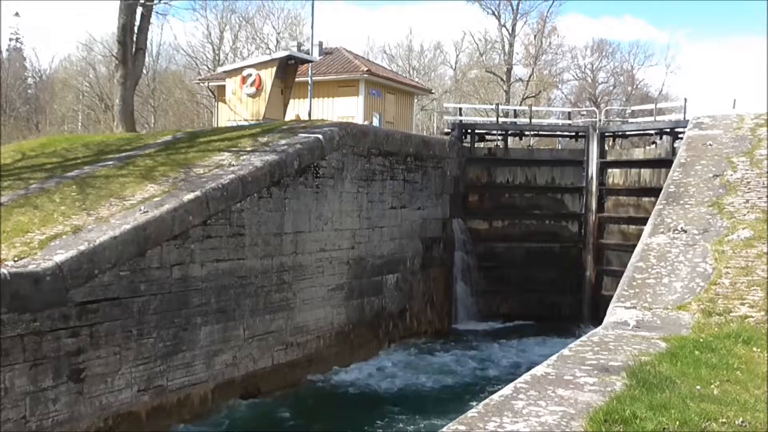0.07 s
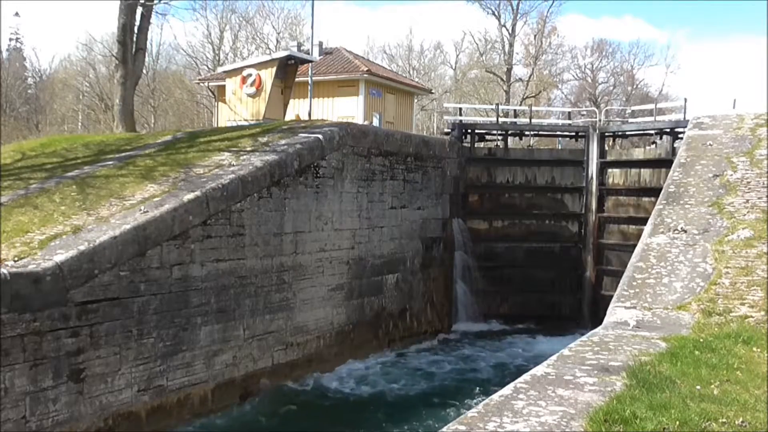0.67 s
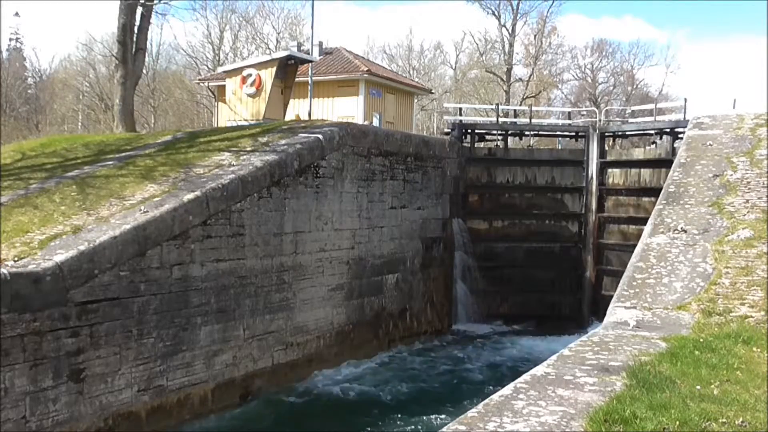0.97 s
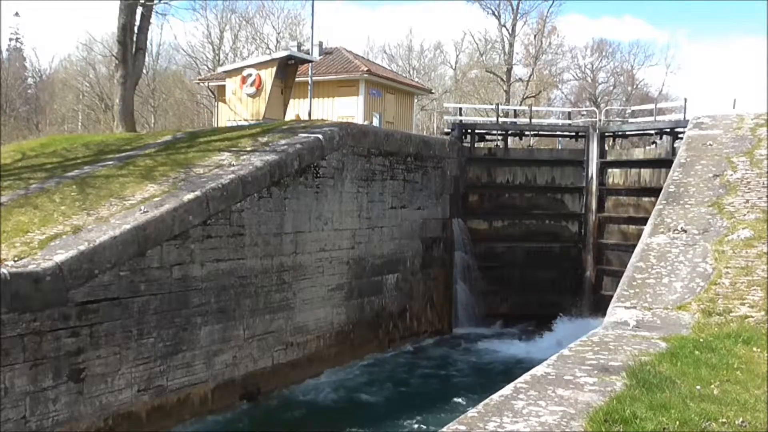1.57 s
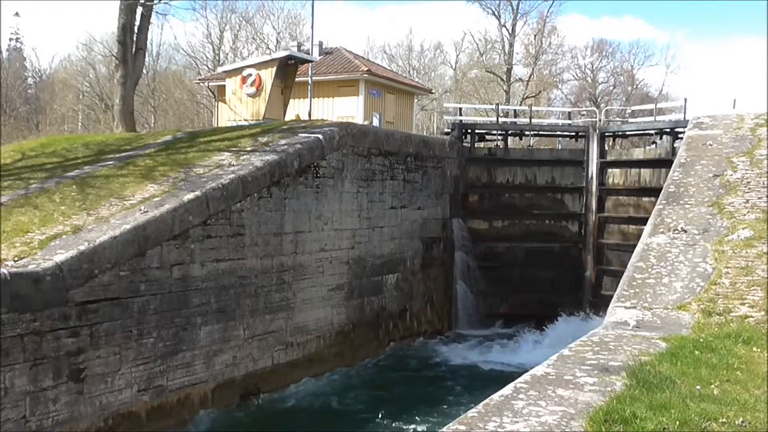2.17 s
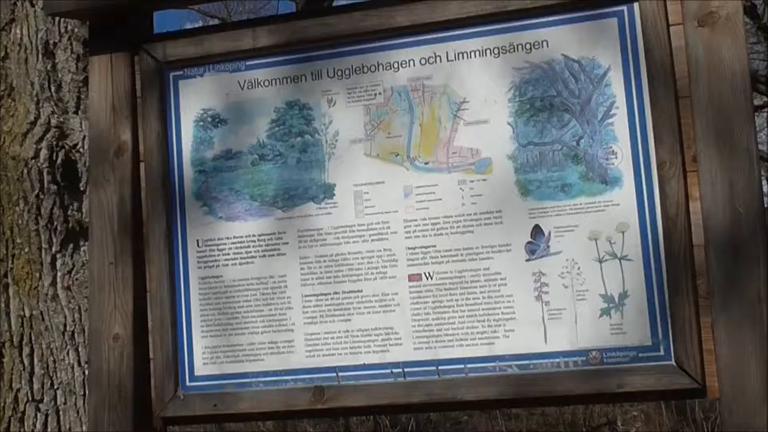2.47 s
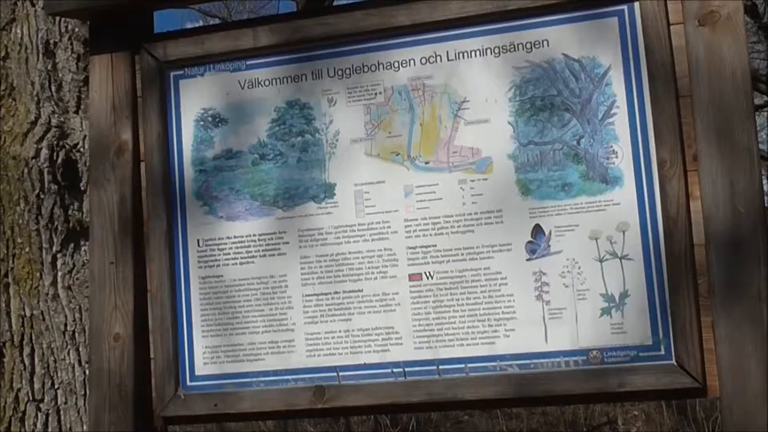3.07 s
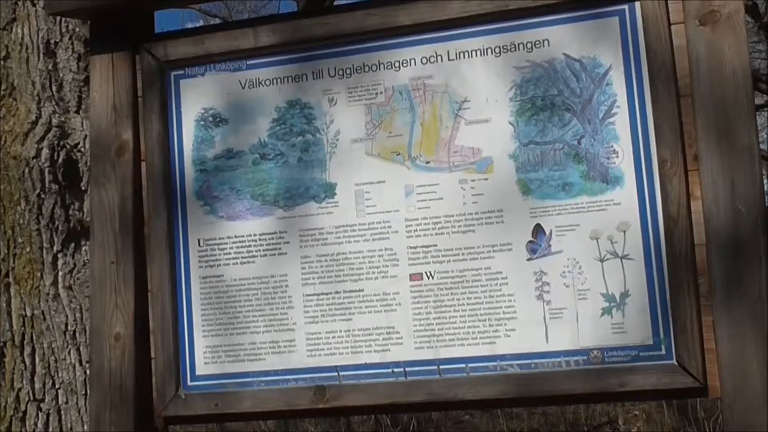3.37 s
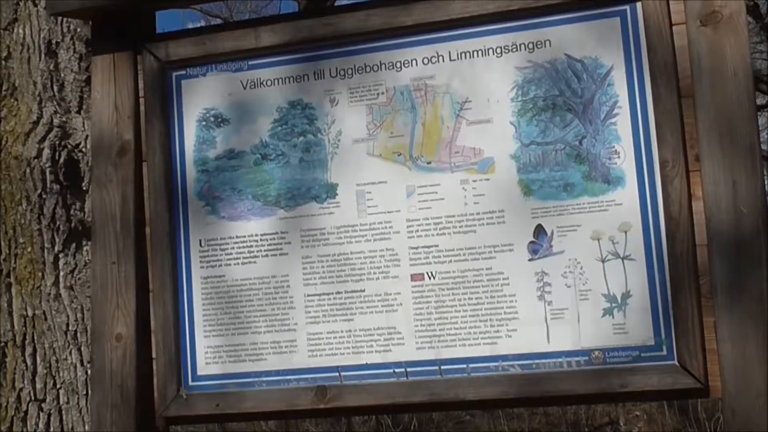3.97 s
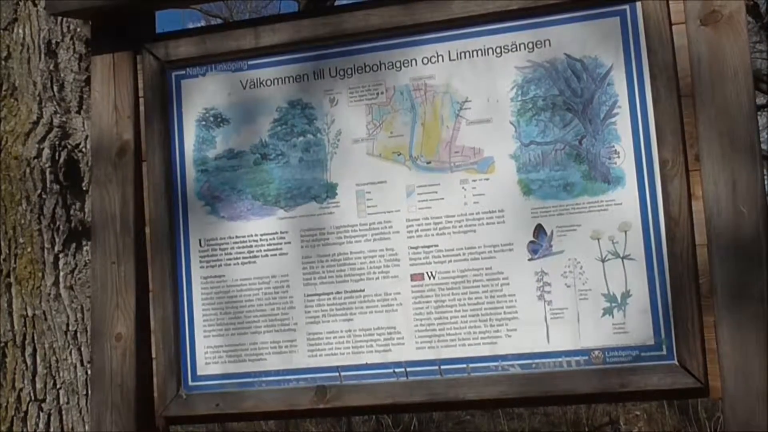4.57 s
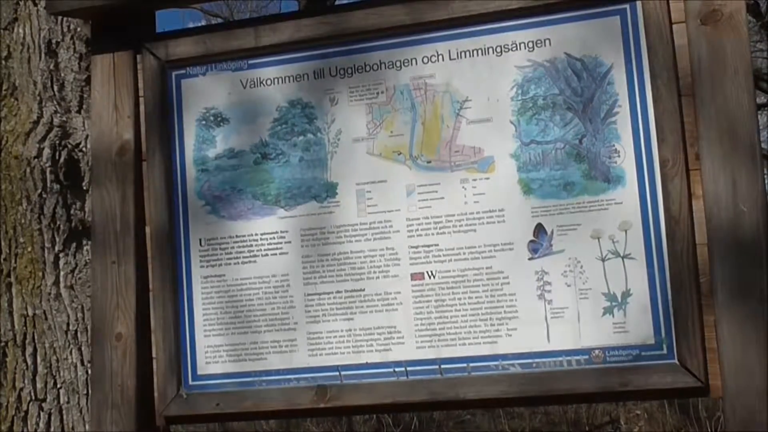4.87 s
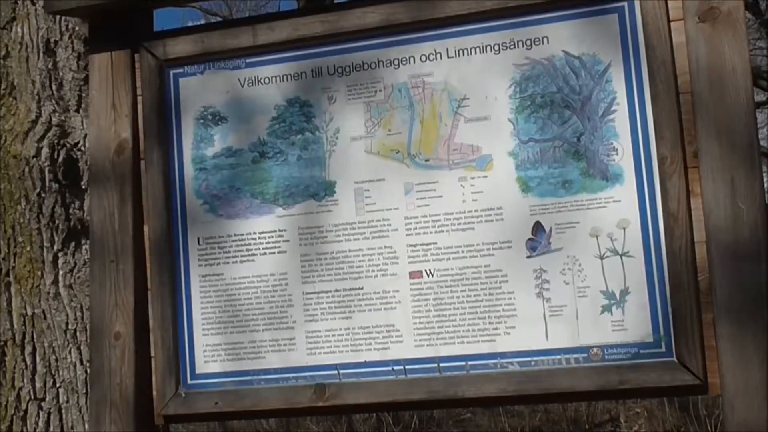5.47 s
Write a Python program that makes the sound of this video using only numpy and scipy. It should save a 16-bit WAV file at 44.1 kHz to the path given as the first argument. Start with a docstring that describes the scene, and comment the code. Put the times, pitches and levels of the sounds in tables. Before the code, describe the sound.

Water pours and churns through canal lock gates, cuts off, then returns as a dull distant rush with wind puffs on the microphone.

```python
"""Leaking canal lock, near and far

Water pours through the gates of a stone lock: the jet drags air under in a glugging rumble, bubbles
churn and boil up, and spray fizzes on the foam. It stops dead. After half a second of silence the rush
is heard from far off, dull, hollow and a little to the left, while puffs of wind buffet the microphone."""
import sys
import numpy as np
from scipy import signal
from scipy.fft import rfft, irfft, next_fast_len
from scipy.io import wavfile

SR = 44100
rng = np.random.default_rng(int(sys.argv[2]) if len(sys.argv) > 2 else 0)


def inscribe(sig):
    """Save sig as 16-bit PCM at rate SR to the path in sys.argv[1].

    A 1-D sig is mono; a 2-D sig holds one channel per row.
    Samples are clipped to [-1, 1] before scaling.
    """
    pcm = np.round(np.clip(np.atleast_2d(sig).T, -1, 1) * 32767)
    wavfile.write(sys.argv[1], SR, pcm.astype(np.int16))


N = 247401
TIME = np.arange(N) / SR
HZ = np.maximum(np.fft.rfftfreq(next_fast_len(N), 1 / SR), 1)
LOCK_END_S, FAR_START_S = 2.3823, 2.9243


# tone of the rumble: freq_hz, level_db
PLUNGE_TONE = [(20, -41.5), (48, -23.5), (65, -9.5), (88, -4), (130, 0), (180, 0.5), (250, 1.5), (280, -3),
               (330, -7.5)]
# heavier gulps of air and the slack between them: centre_s, lift_db
PLUNGE_GULPS = [(0.02, 1), (0.46, -4), (0.54, 1.5), (0.62, -2.5), (0.83, -2.5), (1.06, 1), (1.2, -3.5),
                (1.35, 0), (1.66, -1), (1.99, 1.5), (2.25, -1)]

def plunge(level_db=-25.5, slope_db_per_s=-1, heave_db=0.44):
    """The jet drives big air pockets under in gulps; their rumble slowly eases."""
    fader_db = level_db + slope_db_per_s * TIME + swells(PLUNGE_GULPS, half_s=0.031)
    return from_db(fader_db - heave_db * drift(2.6)) * coloured(wash(), PLUNGE_TONE)


# tone of the churn: freq_hz, level_db
CHURN_TONE = [(330, 1), (400, 2), (560, 0), (860, -5), (1000, -3), (1160, -4.5), (1260, -8.5), (1470, -5),
              (1730, -12), (2000, -12), (2400, -16.5), (2800, -21)]
# bursts of bubbles, in full in the boil and in part in the churn: centre_s, lift_db
BUBBLE_BURSTS = [(0.425, 10), (0.72, 2), (1.44, 0), (2.32, 2)]

def churn(level_db=-25.5, bubble_db=-4, burst_share=0.21, surge_db=0.17):
    """Splashes and smaller bubbles merge into a steady midrange froth."""
    froth = wash() + from_db(bubble_db) * bubbles(5000, band_hz=(298.6, 3104), cycles=12.8, size_db=1)
    fader_db = level_db + burst_share * swells(BUBBLE_BURSTS, half_s=0.016) + surge_db * drift(4.2)
    return from_db(fader_db) * coloured(froth, CHURN_TONE)


# tone of the gurgle: freq_hz, level_db
BOIL_TONE = [(330, -10), (450, -1), (530, 0), (610, 1), (700, -2), (850, -7.5)]
# long hollow upwellings: centre_s, lift_db
BOIL_UPWELLINGS = [(1.04, 2.5), (1.46, 2), (1.67, 1), (1.93, 3), (2.31, 0.5)]

def boil(level_db=-30.5, crest_s=1.35, rise_db_per_s=5.5):
    """Bubbles boil up at the foot of the gates; the gurgle builds to a crest and holds."""
    fader_db = level_db - rise_db_per_s * np.maximum(crest_s - TIME, 0)
    lift_db = swells(BOIL_UPWELLINGS, half_s=0.085) + swells(BUBBLE_BURSTS, half_s=0.016)
    gurgle = bubbles(4000, band_hz=(353, 868), cycles=10, size_db=0, pitches=8)
    return from_db(fader_db + lift_db) * coloured(gurgle, BOIL_TONE)


# tone of the spray: freq_hz, level_db
SPRAY_TONE = [(2800, -3.5), (3400, -4), (3900, -1), (4700, -1), (6400, -3), (7700, -7.5), (8600, -8.5),
              (9500, -14.5), (11000, -13), (13500, -18), (14800, -17.5), (15600, -26)]
# the spray grows as the foam spreads: time_s, level_db
SPRAY_FADER = [(0.0, -32), (1.4, -32.5), (2.37, -31)]

def spray(droplet_db=-5, flutter_db=0.34):
    """Droplets land on the foam in a bright fizz."""
    fizz = wash() + from_db(droplet_db) * bubbles(9000, band_hz=(2480, 15050), cycles=7.6, size_db=2.5)
    fader_db = np.interp(TIME, *np.transpose(SPRAY_FADER)) + flutter_db * drift(12)
    return from_db(fader_db) * coloured(fizz, SPRAY_TONE)


# single glugs: centre_s, pitch_hz, peak_db, half_length_s
GATE_GLUGS = [(0.194, 96, -24.5, .04), (0.268, 187, -24, .05), (0.288, 385, -21.5, 0.011),
              (0.365, 164, -20, .016), (0.557, 490, -22, 0.024), (0.665, 101, -28, 0.027),
              (0.714, 497, -22, .009), (0.718, 158, -25, 0.027), (0.883, 186, -22.5, .017),
              (1.003, 178, -28, 0.067), (1.006, 533, -26, .035), (1.439, 598, -20, 0.013),
              (1.467, 535, -27.5, 0.05), (1.661, 481, -26.5, .04), (1.919, 474, -26, .014),
              (2.321, 453, -22, 0.0072)]

def glugs():
    """Large air pockets ring at the gates, bending up in pitch."""
    return air_pockets(GATE_GLUGS, rise_per_s=0.68)


# stereo image at the lock: freq_hz, coherence
NEAR_COHERENCE = [(30, 0.74), (70, 0.8), (130, 0.97), (500, 1), (1000, 0.95), (2400, 0.84), (3000, 0.92),
                  (5000, .91), (7000, 1), (9500, 0.74), (11300, 0.77), (12800, 1)]
# freq_hz, left_over_right_db
NEAR_PAN = [(60, -2), (130, -2.5), (350, -3), (600, -1), (1000, 2), (1500, 0.2), (2250, 2), (3500, 0),
            (7500, 0), (10500, -1.5), (13000, 0)]
# freq_hz, left_lead_rad
NEAR_PHASE = [(90, -0.25), (250, -0.048), (750, 0.5), (1100, .16), (2000, .2), (2600, 0.021), (15000, 0)]

def lock_fall():
    """The falling water close up, spread in stereo."""
    return spread(plunge() + churn() + boil() + spray() + glugs(), NEAR_COHERENCE, NEAR_PAN, NEAR_PHASE)


# tone of the far roar: freq_hz, level_db
ROAR_TONE = [(20, -11), (47, -24), (62, -3), (108, -2), (135, 1.5), (172, 0.5), (220, 5.5), (285, 3),
             (350, 1), (390, 2), (455, .5), (560, -5.5)]
# hollow resonances: pitch_hz, width_hz, lift_db
ROAR_MODES = [(131, 21, 5), (296, 41, 2.5), (256, 19, 1.5)]
# surges and lulls: centre_s, lift_db
ROAR_SURGES = [(2.94, 3), (3.06, -0.5), (3.27, 3), (3.53, -1.5), (3.68, -2.5), (3.97, 1), (4.13, -4.5),
               (4.32, 0.5), (4.52, -0.5), (4.77, -2), (5.22, 1), (5.34, 3), (5.43, -2), (5.6, 0.5)]

def roar(level_db=-31.5, slope_db_per_s=0.5, heave_db=0.2):
    """Distance merges the splashes into a dull, hollow, surging roar that slowly fills out."""
    fader_db = level_db + slope_db_per_s * (TIME - FAR_START_S) + swells(ROAR_SURGES, half_s=0.032)
    return from_db(fader_db + heave_db * drift(1.3)) * coloured(resonant(wash(), ROAR_MODES), ROAR_TONE)


# tone of the far hiss: freq_hz, level_db
HISS_TONE = [(560, -1), (840, -5), (1000, -5.5), (1420, -8.5), (2000, -14), (2550, -19), (2900, -21.5),
             (3350, -18.5), (3750, -16), (4750, -15.5), (7800, -22.5), (9600, -25.5), (11400, -33.5),
             (14200, -37), (15000, -54)]
# its level ride: time_s, level_db
HISS_FADER = [(2.94, -37.5), (3.35, -38.5), (3.7, -39), (4.6, -39), (5.6, -38.5)]

def hiss(waver_db=0.23):
    """The soft top of the far splashes wavers in the moving air."""
    fader_db = np.interp(TIME, *np.transpose(HISS_FADER)) + waver_db * drift(6.1)
    return from_db(fader_db) * coloured(wash(), HISS_TONE)


# single booms: centre_s, pitch_hz, peak_db, half_length_s
FAR_BOOMS = [(2.976, 279, -32, 0.081), (3.17, 137, -35.5, 0.024), (3.341, 256.5, -31.5, 0.086),
             (3.38, 288, -30, 0.088), (3.602, 223, -23.5, 0.014), (3.713, 133.6, -32, 0.055),
             (3.96, 280, -30, 0.02), (4.024, 166, -30, 0.034), (4.15, 135, -31, 0.029),
             (4.217, 274, -26.5, 0.032), (4.284, 255, -26, 0.021), (4.35, 287, -31.5, 0.043),
             (4.451, 391, -32.5, 0.026), (4.632, 286, -35, 0.088), (4.688, 231, -29.5, 0.048),
             (4.722, 133.5, -29.5, 0.064), (4.843, 223, -26, 0.02), (4.89, 134.6, -30.5, 0.045),
             (4.97, 225, -27, 0.033), (5.002, 286, -34.5, 0.096), (5.077, 136, -25, 0.021),
             (5.35, 139, -29.5, 0.029), (5.539, 295, -32.5, 0.058)]

def booms():
    """Air pockets ring low inside the far roar."""
    return air_pockets(FAR_BOOMS, rise_per_s=0.16)


# stereo image far off: freq_hz, coherence
FAR_COHERENCE = [(40, 0.22), (130, 0.99), (280, 1), (500, 0.89), (900, 0.94), (2000, 0.82), (3000, 0.47),
                 (4500, 0.79), (7000, 0.97), (9000, 0.47), (14000, 0.33)]
# freq_hz, left_over_right_db
FAR_PAN = [(100, -0.7), (650, -0.5), (1100, 5.0), (4000, 5.5), (6500, 4), (8000, -.5), (10000, -2),
           (14000, 1)]
# freq_hz, left_lead_rad
FAR_PHASE = [(120, 0.03), (450, 0.14), (900, 0.93), (1300, 0.69), (4000, 0.3), (5700, 1), (6700, 0.9),
             (8000, 0.84), (10000, 2.6)]

def far_rush():
    """The same water from a distance, sitting a little to the left."""
    return spread(roar() + hiss() + booms(), FAR_COHERENCE, FAR_PAN, FAR_PHASE)


# tone of the turbulence: freq_hz, level_db
WIND_TONE = [(20, -22), (45, -14), (65, -7), (110, 6), (170, -7), (260, -9), (420, -22), (900, -32),
             (2500, -55)]
# puffs out of a light breeze: peak_s, level_db
WIND_PUFFS = [(3.24, -27), (3.58, -25), (3.68, -27), (3.73, -31), (4.06, -25), (4.135, -21), (4.41, -33),
              (4.47, -34), (5.0, -30), (5.17, -29), (5.32, -36)]
# single eddies that thump: centre_s, level_db, pitch_hz
WIND_EDDIES = [(3.237, -14, 150), (3.591, -3, 219), (3.687, -21, 150), (4.121, -12, 160), (4.132, -12, 300),
               (4.138, -14, 140), (4.154, -13, 110), (5.022, -14, 95), (5.04, -10, 135), (5.316, -19, 150)]

def wind(breeze_db=-46, rise_db_per_s=240, fall_db_per_s=260, left_db=-5, right_db=-1):
    """Puffs and eddies press unequally on the microphone's two ports, swinging them in opposite senses."""
    gust_db = breeze_db
    for peak_s, level_db in WIND_PUFFS:
        drop_db = np.maximum(rise_db_per_s * (peak_s - TIME), fall_db_per_s * (TIME - peak_s))
        gust_db = np.maximum(gust_db, level_db - drop_db)
    pressure = from_db(gust_db) * coloured(rng.standard_normal(N), WIND_TONE)
    for centre_s, level_db, hz in WIND_EDDIES:
        passing = (np.pi * hz * (TIME - centre_s)) ** 2
        pressure += from_db(level_db) * (1 - 2 * passing) * np.exp(-passing)   # core and opposite flanks
    return np.array([-from_db(left_db) * pressure, from_db(right_db) * pressure])


def wash():
    """Three noise voices of countless merged splashes."""
    return rng.standard_normal((3, N))


def bubbles(per_s, band_hz, cycles, size_db, pitches=16):
    """Three voices of bubbles, born at random, each ringing a few cycles at the pitch of its size."""
    out = np.zeros((3, N))
    for hz in np.geomspace(*band_hz, pitches):
        chance = rng.random((3, N)) * SR * pitches / per_s
        born = chance < 1
        sizes = np.minimum(-np.log(chance[born] + 1e-12), 5)   # big ones are exponentially rarer
        clicks = np.full((3, N), 1e-18)
        clicks[born] = from_db(size_db * sizes)
        decay = from_db(-60 * hz / (cycles * SR))
        poles = [1, -2 * decay * np.cos(2 * np.pi * hz / SR), decay ** 2]
        out += np.sqrt(hz) * rms_one(signal.lfilter([1, 0, -1], poles, clicks))   # even power per Hz
    return rms_one(out)


def air_pockets(rows, rise_per_s):
    """Each pocket swells, rings and fades, its pitch climbing as it nears the surface; direct voice only."""
    out = np.zeros((3, N))
    for (centre_s, hz, peak_db, half_s), phase in zip(rows, rng.random(len(rows))):
        age = TIME - centre_s
        turns = phase + hz * age * (1 + .5 * rise_per_s * age)
        out[0] += from_db(peak_db) * np.exp(-(age / half_s) ** 2) * np.sin(2 * np.pi * turns)
    return out


def resonant(voices, modes, wander_db=2, wander_s=0.00201):
    """Boost narrow bands that each swell and fade; a wavering delay bends their pitch."""
    lifted = voices.copy()
    for hz, width_hz, lift_db in modes:
        band = filtered(voices, (from_db(lift_db) - 1) / (1 + 2j * (HZ - hz) / width_hz))
        lifted += from_db(wander_db * drift(5.6)) * band
    bent_time = TIME + wander_s * drift(2.46)
    return np.array([np.interp(bent_time, TIME, voice) for voice in lifted])


def spread(voices, coherence, pan, phase):
    """One direct voice reaches both ears, two scattered voices one ear each."""
    alike = np.clip(per_hz(coherence), 0, .995)
    sides = np.array([[1], [-1]])
    direct = filtered(voices[0], np.sqrt(alike) * np.exp(.5j * sides * per_hz(phase)))
    scattered = filtered(voices[1:], np.sqrt(1 - alike))
    return filtered(direct + scattered, from_db(sides * per_hz(pan) / 2))


def swells(rows, half_s):
    """Lift in dB from bell-shaped swells of one length."""
    return sum(lift_db * np.exp(-((TIME - centre_s) / half_s) ** 2) for centre_s, lift_db in rows)


def drift(rate_hz):
    """Slow random modulation at unit power."""
    return rms_one(filtered(rng.standard_normal(N), 1 / (1 + (HZ / rate_hz) ** 2)))


def coloured(x, tone):
    """EQ to a tone curve, rolled off past its ends, at unit power."""
    skirts = 1 / np.sqrt((1 + (HZ / tone[-1][0]) ** 8) * (1 + (tone[0][0] / HZ) ** 8))
    return rms_one(filtered(x, from_db(per_hz(tone)) * skirts))


def filtered(x, response):
    """Pass a signal through a frequency response."""
    size = next_fast_len(N)
    return irfft(rfft(x, size) * response, size)[..., :N]


def per_hz(points):
    """A table read along a log-frequency axis."""
    hz, value = np.transpose(points)
    return np.interp(np.log(HZ), np.log(hz), value)


def rms_one(x):
    """Scale to unit power."""
    return x / np.sqrt(np.mean(x ** 2) + 1e-20)


def from_db(db):
    """Decibels to gain."""
    return 10 ** (np.asarray(db) / 20)


def scene(tail_db=-18, tail_db_per_s=750, tail_s=0.039, fade_s=0.001):
    """The lock stops dead with a brief faint tail; after the silence come the far rush and the wind."""
    after = TIME - LOCK_END_S
    tail = from_db(tail_db - tail_db_per_s * np.clip(after, 0, .5))
    tail *= np.clip((tail_s - after) / fade_s, 0, 1)
    at_lock = np.maximum(np.clip(.5 - after / fade_s, 0, 1), tail)
    far_off = np.clip(.5 + (TIME - FAR_START_S) / fade_s, 0, 1)
    return at_lock * lock_fall() + far_off * (far_rush() + wind())


def record(dry, cutoff_hz=15700):
    """A steep low-pass takes off the very top."""
    return signal.sosfilt(signal.ellip(10, .1, 80, cutoff_hz, fs=SR, output="sos"), dry)


dry = scene()
out = record(dry)
inscribe(out)
```